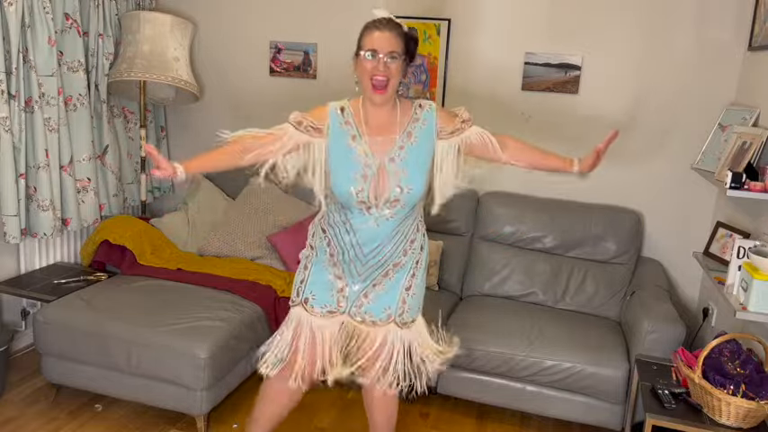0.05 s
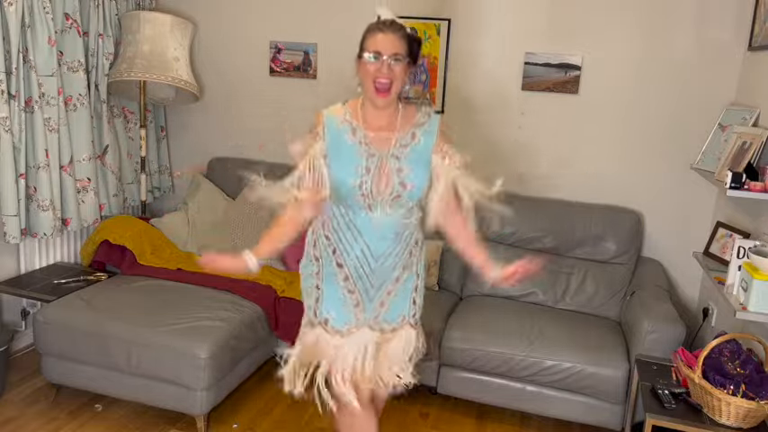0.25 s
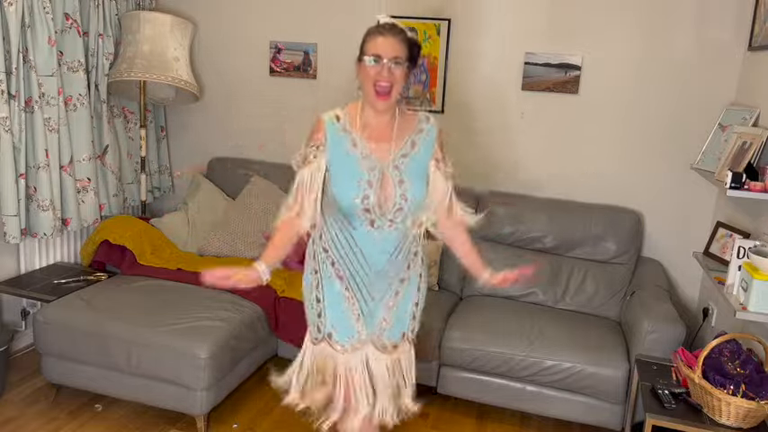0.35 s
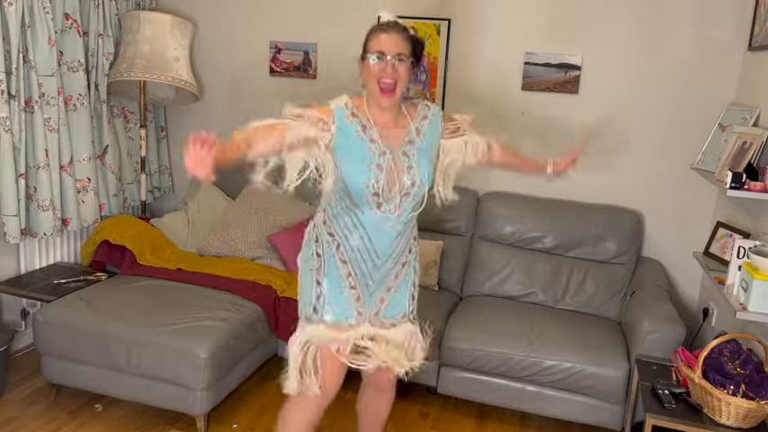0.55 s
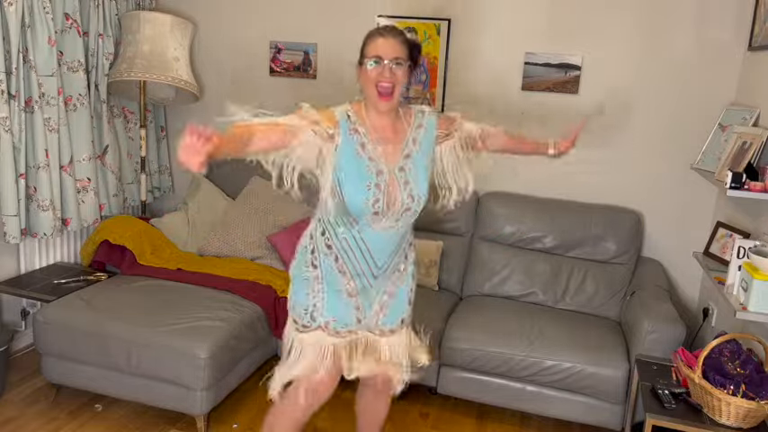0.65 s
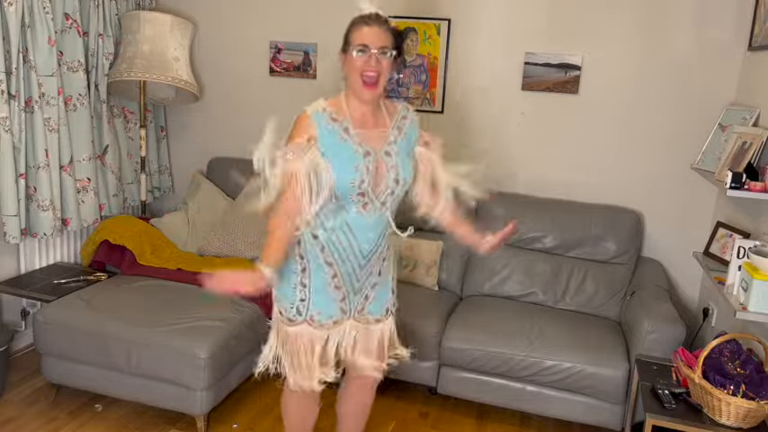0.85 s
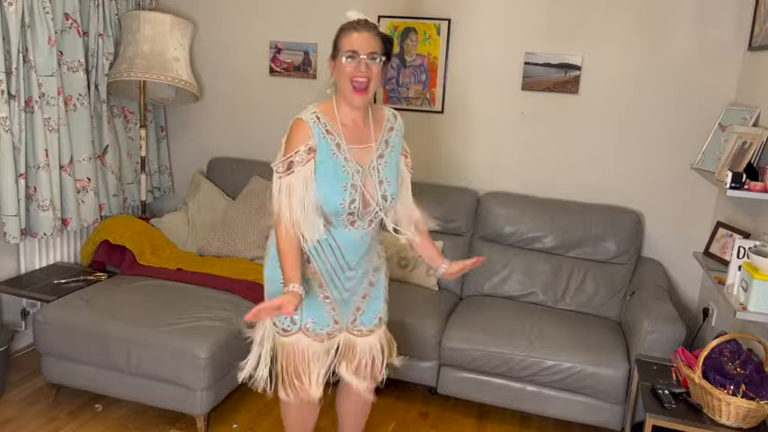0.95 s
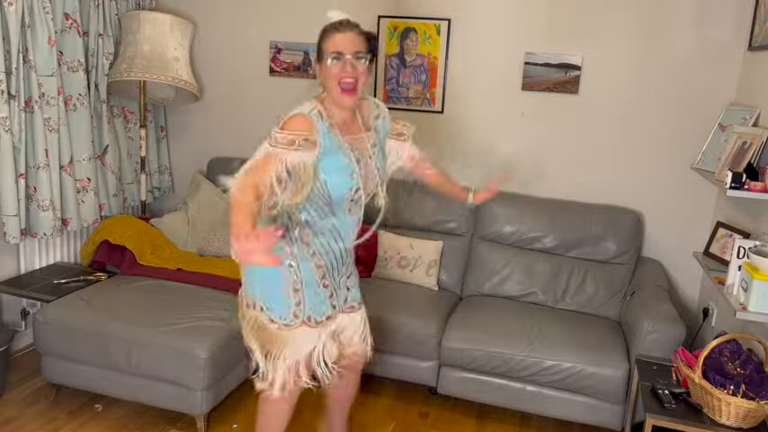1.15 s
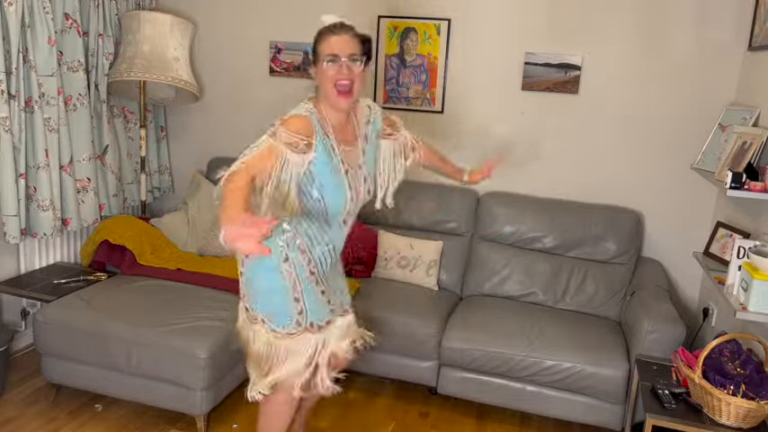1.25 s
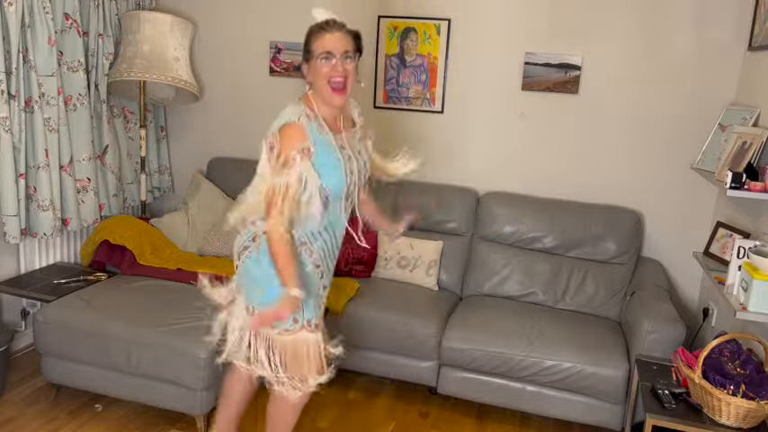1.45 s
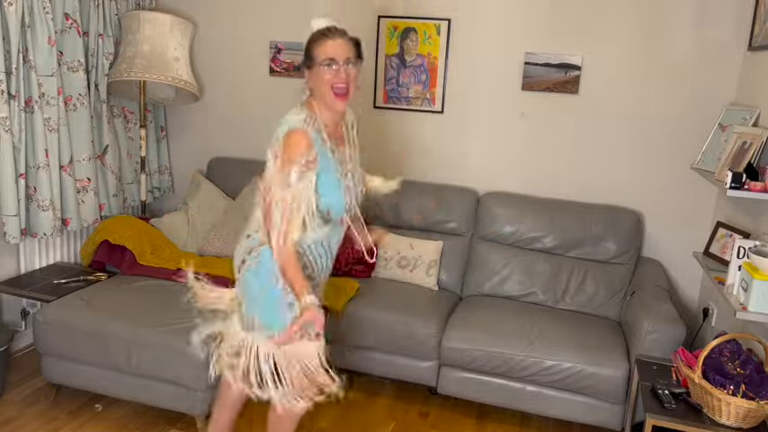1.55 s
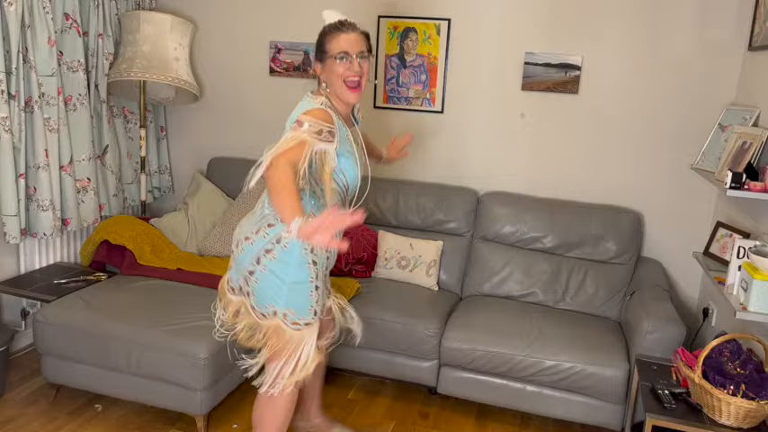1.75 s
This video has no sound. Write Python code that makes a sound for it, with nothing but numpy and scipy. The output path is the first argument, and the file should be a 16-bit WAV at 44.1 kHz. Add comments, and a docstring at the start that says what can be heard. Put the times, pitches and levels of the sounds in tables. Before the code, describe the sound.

Energetic dance steps on a wooden floor: a deep soft thump early, scuffing soles, a sharp flat slap midway, then lighter taps and scuffs, with beaded fringe rustling in a quiet living room, heard from a few steps away.

```python
"""Dancing on a wooden floor

Someone dances in a living room, a few steps away, over quiet room tone.
Heels and toes ring damped board tones and thuds of noise; slow low tones are the joists under the weight.
One sole slaps down flat in short noise cracks. Swelling grains of friction make the scuffs, and finer
grains the steady rustle of a beaded fringe, with bright noise bursts where beads click together."""
import sys
import numpy as np
from scipy import signal
from scipy.fft import rfft, irfft, next_fast_len
from scipy.io import wavfile

SR = 44100
rng = np.random.default_rng(int(sys.argv[2]) if len(sys.argv) > 2 else 0)


def file_out(sig):
    """Save sig as 16-bit WAV at sys.argv[1]."""
    # one column per channel
    cols = np.atleast_2d(sig).T
    # limit, then scale
    lim = np.clip(cols, -1, 1)
    pcm = np.round(lim * 32767).astype(np.int16)
    wavfile.write(sys.argv[1], SR, pcm)


N = 79380  # samples, 1.8 s


def amp(db):
    """Decibels to gain."""
    return 10 ** (np.asarray(db) / 20)


def unit(x):
    """Scale to rms 1."""
    return x / np.sqrt(np.mean(x ** 2) + 1e-20)


def along(points, hz):
    """Read a curve of (Hz, value) points on a log frequency axis."""
    f, v = np.transpose(points)
    return np.interp(np.log(hz + 1), np.log(np.sort(f) + 1), v)


def filtered(x, response):
    """Multiply the spectrum of x by a response of frequency."""
    n = x.shape[-1]
    m = next_fast_len(n + SR // 10)
    hz = np.fft.rfftfreq(m, 1 / SR)
    return irfft(rfft(x, m) * response(hz), m)[..., :n]


def colour(x, spectrum):
    """Give x the spectrum's dB curve, at rms 1."""
    return unit(filtered(x, lambda hz: amp(along(spectrum, hz))))


def spread(pair):
    """Turn two unrelated signals into left and right that are more or less alike at each frequency."""
    # Likeness of left and right. Each row: frequency in Hz, correlation from 0 to 1.
    likeness = [(50, .985), (150, .95), (290, .88), (620, .3), (1300, 0), (2400, .6), (4400, .4),
                (7000, .4), (7700, .995), (9200, .995), (10000, .6), (13500, .6), (14500, .99)]

    def mid_side_gains(hz):
        angle = np.arccos(np.clip(along(likeness, hz), -1, 1)) / 2
        return np.array([np.cos(angle), np.sin(angle)])

    mid, side = filtered(pair, mid_side_gains)
    return np.array([mid + side, mid - side])


def pair_gains(db):
    """Gains of two signals, the first db above the second."""
    return amp(np.array([[db], [-db]]) / 2)


def add(track, sound, s):
    """Mix a stereo sound into the track at a time in seconds."""
    i = max(round(s * SR), 0)
    track[:, i:i + sound.shape[1]] += sound[:, :N - i]


def in_room(x, wet_db):
    """Add the room as a tail of decaying noise, drawn anew at each call."""
    # Decay of the living room. Each row: frequency in Hz, time to fall 60 dB in seconds.
    decay = [(100, 0.37), (260, 0.47), (700, 0.35), (1500, 0.31), (4000, 0.39), (12000, 0.17)]
    noise = rng.standard_normal((2, SR // 2))
    hz, t, z = signal.stft(noise, SR, nperseg=256)
    fade = amp(-60 * t / along(decay, hz)[:, None])
    tail = signal.istft(z * fade, SR, nperseg=256)[1]
    tail = tail / np.linalg.norm(tail[0])
    wet = signal.fftconvolve(x, tail, axes=1)[:, :x.shape[1]]
    return spread(x + amp(wet_db) * wet)


def burst(spectrum, t60):
    """A crack of coloured noise that falls 60 dB in t60 seconds."""
    t = np.arange(SR // 2) / SR
    return colour(rng.standard_normal((2, len(t))), spectrum) * amp(-60 * t / t60)


def grains(per_s, spectrum):
    """Two streams of dense tiny contacts of uneven size, at random moments."""
    hits = rng.random((2, N)) < per_s / SR
    unevenness = amp(2.5 * rng.standard_normal((2, N)))  # spread in dB
    return colour(hits * rng.standard_normal((2, N)) * unevenness, spectrum)


def room_tone():
    """The quiet air of the room: steady coloured noise."""
    # Colour of the room tone. Each row: frequency in Hz, level in dB.
    air_colour = [(25, 11), (48, 22), (100, 5.5), (200, -3.5), (700, -18.5), (1200, -14.5), (1650, -6),
                  (2400, -21.5), (6000, -17.5), (14000, -17)]
    return amp(-56.5) * spread(colour(rng.standard_normal((2, N)), air_colour))


def joists():
    """The floor swings under the dancer's weight: a low boom that swells and fades."""
    # Weight landing on the floor. Each row: start in seconds, level in dB, pitch in Hz.
    loads = [(-.084, -45, 49.6), (0.179, -40.5, 46), (.235, -41, 62), (0.289, -27, 53.6),
             (0.333, -21.5, 50.3), (0.44, -33, 51), (0.508, -37, 49.9), (0.582, -42.5, 45.2),
             (.803, -34.5, 49.3), (0.934, -40.5, 48.9), (1.037, -38.5, 52.3), (1.14, -41.5, 60),
             (1.225, -42.5, 49.2), (1.496, -37.5, 53.9), (1.612, -41.5, 51.3), (1.729, -47.5, 49)]
    # Partials of the boom. Each row: multiple of the pitch, level in dB.
    partials = [(0.999, 0), (1.5, -13), (1.9, -27.5)]
    rise_s, steepness = 0.026, 0.71  # time to the peak of the swell, exponent on its shape
    out = np.zeros(N)
    for s, db, hz in loads:
        t = np.maximum(np.arange(N) / SR - s, 0)
        u = t / rise_s
        swell = (u * np.exp(1 - u)) ** steepness
        boom = sum(amp(db + level) * np.sin(2 * np.pi * hz * k * t) for k, level in partials)
        out += swell * boom
    return out


def strokes():
    """Strength of the foot strokes in two grain streams: each one swells and dies exponentially."""
    # Scuffs and swishes. Each row: peak in seconds, level in dB, rise in seconds, fall in seconds,
    # first stream over second in dB (rise and fall are times to change by a factor e).
    sweeps = [(0.124, -58, .012, 0.2, 3), (0.243, -50, 0.051, 0.045, 1.5), (0.441, -53.5, 0.041, 0.037, 3),
              (0.498, -50.5, 0.0095, 0.062, 0.5), (0.798, -47.5, 0.016, 0.048, 14),
              (.845, -54.5, 0.024, .035, -16), (1.021, -62.5, .06, 0.046, 18),
              (1.128, -45, 0.084, 0.042, 0), (1.27, -67.5, 0.094, 0.042, 6),
              (1.438, -54.5, 0.037, 0.077, 3.5), (1.64, -50, .006, 0.041, 1.5),
              (1.706, -52, 0.088, 0.058, -0.5)]
    t = np.arange(N) / SR
    each = []
    for s, db, rise, fall, lead_db in sweeps:
        swell = np.exp(-np.maximum((s - t) / rise, (t - s) / fall))
        each.append(amp(db) * pair_gains(lead_db) * swell)
    return np.sqrt(np.sum(np.square(each), axis=0) + 1e-12)


def fringe(strength):
    """Bead grains rustle all the time, more with each stroke, and some beads click together."""
    # Colour of the rustle. Each row: frequency in Hz, level in dB.
    rustle_colour = [(1500, -7), (4000, -12), (7000, -2), (10000, -2.5), (12500, 13), (15000, -20.5)]
    # Beads clicking together. Each row: start in seconds, level in dB, time to fall 60 dB in seconds.
    clicks = [(0.098, -59, 0.072), (0.116, -52.5, 0.043), (0.476, -50.5, .04), (0.658, -59, 0.27),
              (0.737, -51.5, 0.16), (0.969, -34.5, 0.0019), (0.9703, -48.5, .03), (1.635, -52, .03)]
    # Colour of a click. Each row: frequency in Hz, level in dB.
    bead_colour = [(1000, -59), (3000, -20), (4800, -6), (6500, -3), (10000, -1.5), (12000, -1),
                   (15000, -3.5)]
    # a constant floor under the movement; the exponent softens how far the rustle follows it
    movement = (unit(strength.mean(0)) + 0.12) ** 0.48
    rustle = amp(-69.5) * movement * grains(4900, rustle_colour)
    out = spread(rustle)
    for s, db, t60 in clicks:
        add(out, amp(db) * in_room(burst(bead_colour, t60), wet_db=-5), s)
    return out


def steps():
    """Each contact rings the boards and thuds; a softer one keeps only their low notes."""
    # Heel and toe contacts. Each row: start in seconds, level in dB,
    # hardness as a treble corner in Hz, time for the thud to fall 60 dB in seconds.
    contacts = [(0.109, -46.5, 188, 0.15), (0.215, -41.5, 413, 0.18), (.272, -40.5, 179, 0.48),
                (0.336, -42, 800, .1), (0.348, -36, 350, 0.098), (.422, -35.5, 179, 0.14),
                (.733, -52, 185, 0.027), (.772, -35, 214, 0.067), (.945, -51.5, 210, 0.27),
                (1.015, -48, 226, 0.25), (1.399, -42, 640, 0.03), (1.464, -39.5, 960, 0.057),
                (1.476, -37, 425, .1), (1.562, -52.5, 510, .08)]
    # Floorboard modes. Each row: nominal frequency in Hz, level in dB, time to fall 60 dB in seconds.
    modes = [(159.3, -4.5, 0.4), (212.5, -3.5, 0.54), (251.5, 1, 0.32), (295, -14.5, 0.15),
             (366.2, -15, 0.49), (395.6, -1.5, 0.16), (461, -6, 0.74), (612, -3, 0.36), (814, 2, 0.33),
             (1083, -1.5, 0.45)]
    # Dense wood resonances in the thud. Each row: frequency in Hz, level in dB.
    thud_colour = [(60, -26), (110, -9.5), (170, -0.5), (250, 1), (430, 0), (640, -2.5), (850, -6),
                   (1250, -2.5), (1650, -4), (2400, -1), (7000, -15.5)]
    ring_db, thud_db = -8, 6
    out = np.zeros((2, N))
    t = np.arange(SR // 2) / SR
    for s, db, corner_hz, thud_t60 in contacts:
        ring = np.zeros((2, len(t)))
        for hz, level, t60 in modes:
            detuned_hz = hz * (1 + rng.normal(0, .012))
            cycles = detuned_hz * t + rng.random((2, 1))
            ring += amp(level - 60 * t / t60) * np.sin(2 * np.pi * cycles)
        thud = in_room(burst(thud_colour, thud_t60), wet_db=3)
        knock = amp(ring_db) * spread(ring) + amp(thud_db) * thud

        def softness(hz):
            # second-order low-pass
            return 1 / (1 + 1j * np.sqrt(2) * hz / corner_hz - (hz / corner_hz) ** 2)

        add(out, amp(db) * filtered(knock, softness), s)
    return out


def scuffs(strength):
    """Soles rub round on the boards: fine friction grains under each stroke."""
    # Colour of the friction. Each row: frequency in Hz, level in dB.
    scuff_colour = [(120, 4), (250, -4), (420, -2.5), (600, -5.5), (900, -2), (1300, 0), (1700, -4),
                    (2300, -3), (4600, -2), (6000, -7), (7400, -9.5), (11000, -12), (15000, -18)]
    return in_room(strength * grains(9000, scuff_colour), wet_db=-3)


def slap():
    """The sole lands flat, in a few quick contacts of short noise."""
    # Contacts of the flat sole. Each row: start in seconds, level in dB.
    contacts = [(.7645, -32.5), (.7688, -32.5), (.786, -47)]
    # Colour of the slap. Each row: frequency in Hz, level in dB.
    sole_colour = [(100, -24.5), (240, 5), (400, -9), (700, -15), (1100, 3), (1600, 0), (2200, 2),
                   (3000, -3), (5000, -7.5), (7000, -9.5), (12000, -15.5), (15000, -13)]
    out = np.zeros((2, N))
    for s, db in contacts:
        add(out, amp(db) * in_room(burst(sole_colour, t60=0.012), wet_db=2), s)
    return out


def scene():
    """Feet, floor and dress over quiet room tone."""
    strength = strokes()
    floor = joists() + steps()
    soles = scuffs(strength) + slap()
    return room_tone() + floor + soles + fringe(strength)


def record(dry):
    """Stereo colouring: fixed left and right filters, differing in level and phase, under one band limit."""
    # Colour shared by both channels. Each row: frequency in Hz, level in dB.
    shared_colour = [(20, -4.5), (40, 0), (600, 2.5), (1200, 5.5), (2400, 3.5), (5000, .5), (8300, -.5),
                     (11000, 1.5), (14000, 1), (15000, 1), (15800, -28)]
    # Level difference of the channels. Each row: frequency in Hz, left over right in dB.
    lean = [(60, -1.1), (400, -0.3), (700, -3.5), (1300, -0.5), (2400, -0.1), (4400, 6), (7600, -4),
            (15000, 1)]
    # Phase difference of the channels. Each row: frequency in Hz, lead of the left in radians.
    phase_lead = [(300, 0), (1900, 0), (2900, .7), (4700, .5), (5700, -.9), (7300, -1.5), (7700, -3.1),
                  (9100, -3.18), (9700, -5.2), (10700, -6.2), (13700, -6.9), (14500, -9.38), (15700, -9.44)]
    top_hz = 15750  # nothing passes from here up
    half = np.array([[.5], [-.5]])  # each difference is split evenly between left and right

    def channel_filters(hz):
        gain = amp(along(shared_colour, hz) + half * along(lean, hz))
        phase = np.exp(1j * half * along(phase_lead, hz))
        return gain * phase * (hz < top_hz)

    return filtered(dry, channel_filters)


dry = scene()
out = record(dry)
file_out(out)
```